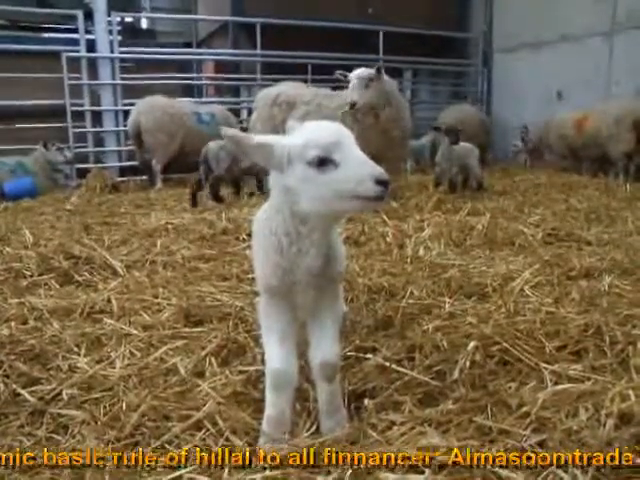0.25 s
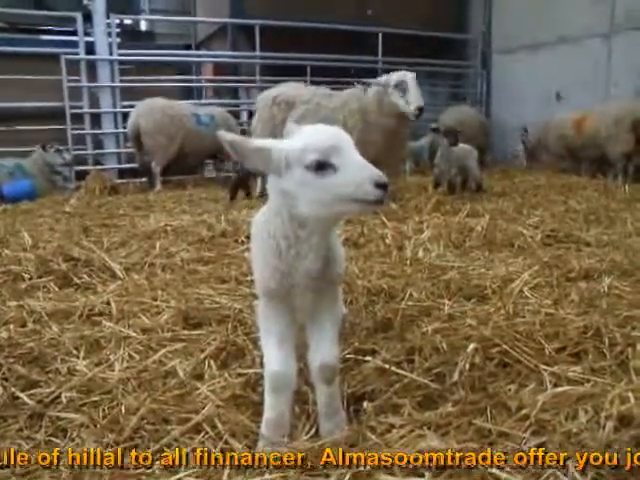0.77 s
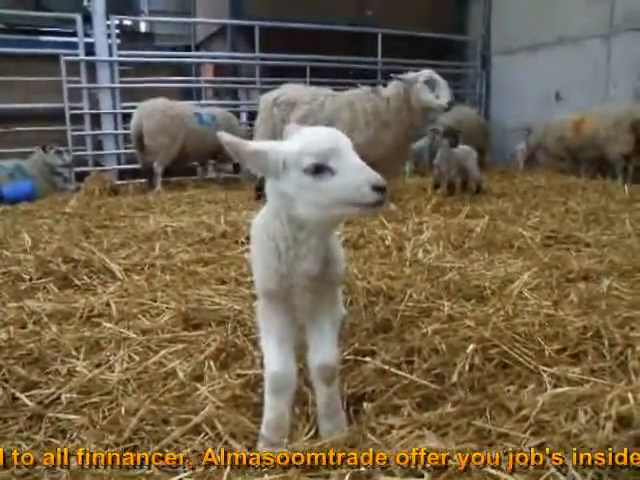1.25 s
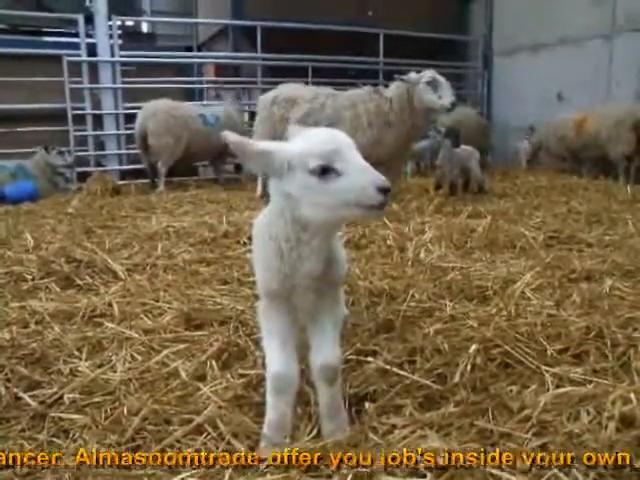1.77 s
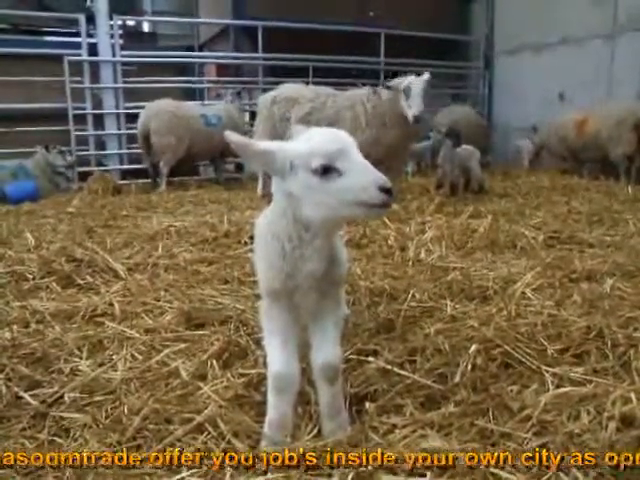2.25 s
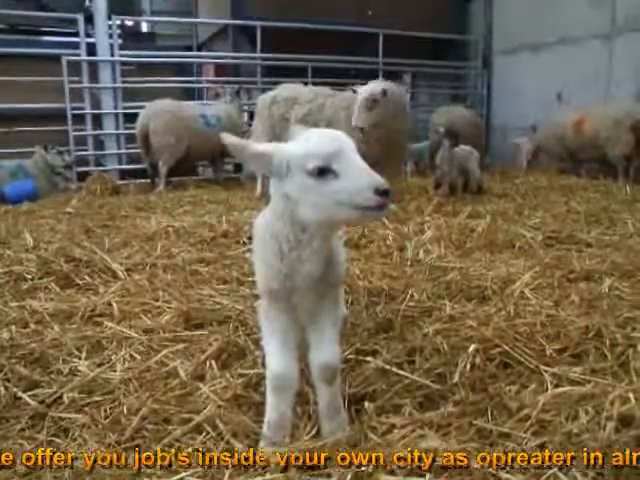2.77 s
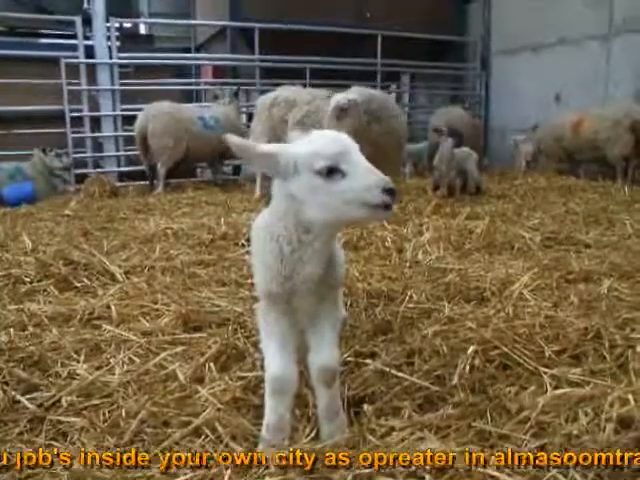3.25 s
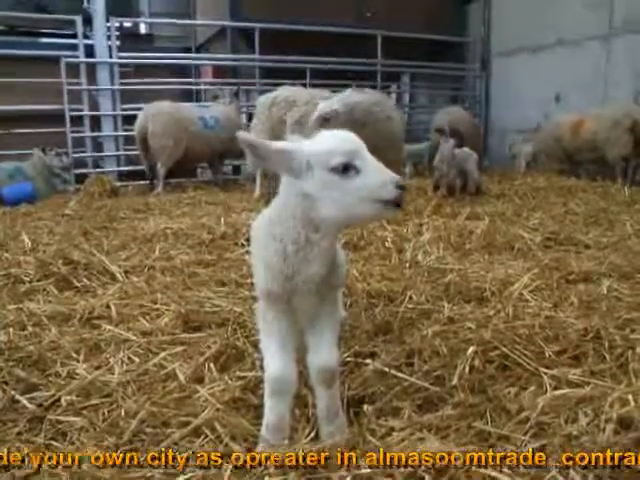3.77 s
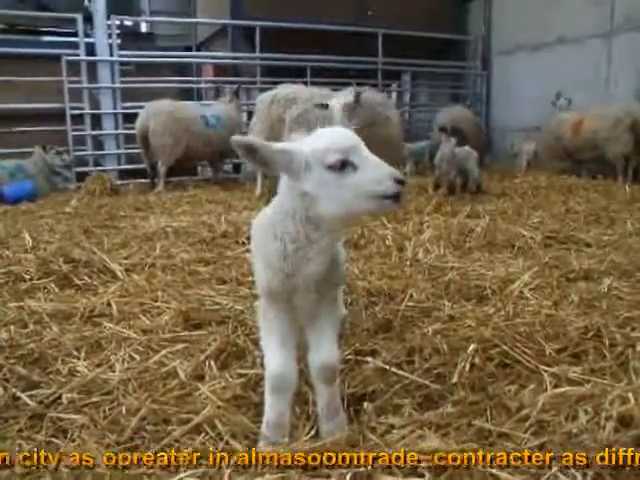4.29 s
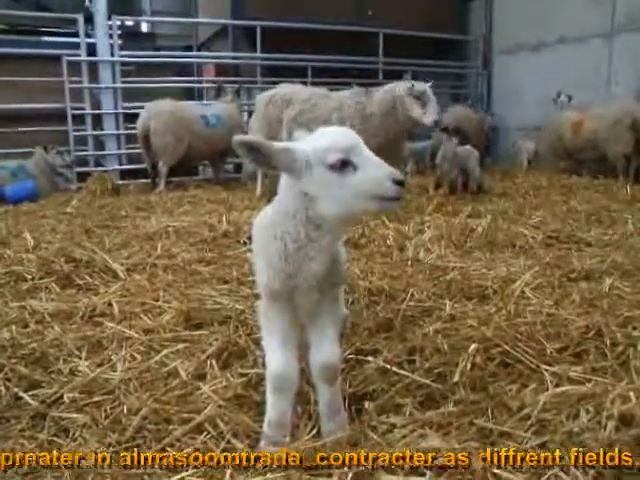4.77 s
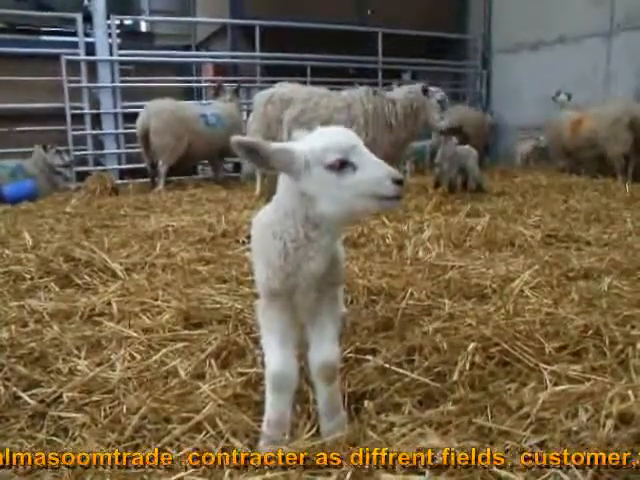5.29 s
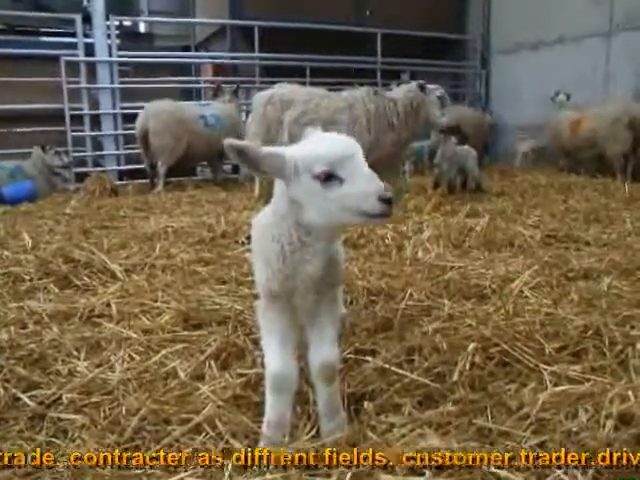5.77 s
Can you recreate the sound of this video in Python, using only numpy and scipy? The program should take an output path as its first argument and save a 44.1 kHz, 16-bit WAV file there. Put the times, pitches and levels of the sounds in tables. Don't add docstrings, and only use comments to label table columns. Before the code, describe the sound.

A trembling young bleat fades over a hoarse ewe, then a bright lamb, distant ewes and a loud raspy near ewe call in a barn.

```python
import sys
import numpy as np
from scipy import signal
from scipy.io import wavfile
from scipy.ndimage import uniform_filter1d

SR = 44100
rng = np.random.default_rng(int(sys.argv[2]) if len(sys.argv) > 2 else 0)


def ratio_of_db(decibels):
    return 10 ** (np.asarray(decibels, float) / 20)


def put_to_file(sound):
    columns = np.atleast_2d(sound).T
    safe = np.clip(columns, -1, 1)
    whole_steps = np.round(safe * 32767)
    wavfile.write(sys.argv[1], SR, whole_steps.astype(np.int16))


N = 265923

# time_s, pitch_hz, effort_db
CALL_YEARLING = [
    (0.0, 189.3, -12),
    (0.1, 185, -16.5),
    (0.244, 175.4, -16),
    (0.332, 168.4, -22),
    (0.378, 158.6, -25.5),
    (0.43, 165, -30.5),
    (0.5, 182.6, -37),
    (0.66, 181, -44),
]
CALL_FIRST = [
    (0.0, 129.1, -19.5),
    (0.142, 129.9, -20),
    (0.496, 130.4, -28),
    (0.594, 124, -29.5),
    (0.708, 125.7, -38.5),
    (0.9, 106.4, -56),
]
CALL_OUTSIDE = [
    (1.15, 163.7, -64),
    (1.272, 164, -44.5),
    (1.5, 160.3, -46),
]
CALL_LAMB = [
    (1.5, 156.6, -54),
    (1.544, 157.3, -41),
    (1.64, 180.6, -18.5),
    (1.734, 211.5, -13),
    (1.862, 228.3, -16),
    (2.284, 225.8, -20),
    (2.414, 227.5, -23.5),
    (2.566, 219.9, -24.5),
    (2.74, 224.9, -47),
]
CALL_UNDER = [
    (1.7, 110.1, -48),
    (1.8, 116.9, -28.5),
    (1.952, 134.5, -24),
    (2.098, 131.5, -25.5),
    (2.31, 116.7, -28),
    (2.452, 114, -28),
    (2.562, 116.6, -30),
    (2.7, 114, -52),
]
CALL_FAR = [
    (2.56, 121.5, -39),
    (2.694, 120.6, -39.5),
    (2.972, 121.6, -30.5),
    (3.278, 121, -31.5),
    (3.57, 121.5, -35),
    (3.738, 120.3, -42.5),
    (3.9, 121.6, -52),
]
CALL_NEAR = [
    (4.05, 90.05, -53.5),
    (4.196, 104.8, -44),
    (4.25, 113.7, -33.5),
    (4.364, 124.6, -21.5),
    (4.54, 131, -16.5),
    (4.654, 130, -18),
    (4.768, 136, -17),
    (4.968, 134.4, -20.5),
    (5.1, 136.9, -27),
]
CALL_LAST = [
    (4.99, 134.7, -29.5),
    (5.314, 126.4, -31),
    (5.41, 121.6, -30.5),
    (5.6, 118.7, -36),
    (5.8, 116.6, -48),
]
CALL_REPLY = [
    (5.0, 118.4, -32),
    (5.2, 117.8, -39),
    (5.3, 117.8, -30.5),
    (5.622, 118.1, -33),
    (5.816, 117.4, -43),
    (5.908, 117.7, -65),
    (6.0, 118, -60),
]

# chest_full_db, chest_share, throat_full_db, throat_share
BUILD_YEARLING = (-19.5, 0.66, -26.5, 0.38)
BUILD_FIRST = (-35.5, .75, -27.5, 0.5)
BUILD_OUTSIDE = (-55, -1, -51, 1.5)
BUILD_LAMB = (-39.5, .4, -25.5, 0.78)
BUILD_UNDER = (-36, 1.7, -29, 0.2)
BUILD_FAR = (-60, 6, -37.5, 1.4)
BUILD_NEAR = (-32, 0.37, -18, 1.19)
BUILD_LAST = (-33.5, 1.2, -26, 1.14)
BUILD_REPLY = (-60.5, 0.3, -36, 0.8)

# peak_s, height_db, length_s
QUAVER_YEARLING = [
    (0.0, 14.5, 0.036),
    (0.061, 13, 0.12),
    (0.223, 11, .09),
    (0.292, 16, 0.1),
    (0.442, 12, 0.057),
]
QUAVER_FIRST = [
    (0.366, 14.5, 0.045),
    (0.435, 12, 0.086),
    (0.509, 12.6, 0.095),
    (0.64, 9.4, 0.11),
]
QUAVER_OUTSIDE = [
    (1.392, 7.8, .17),
]
QUAVER_LAMB = [
    (1.56, 10.5, 0.076),
    (1.742, 10.7, 0.12),
    (1.872, 13.6, 0.074),
    (2.008, 16, 0.083),
    (2.144, 12.1, 0.21),
    (2.3, 12.2, 0.29),
    (2.394, 14, 0.11),
    (2.5, 11.7, 0.12),
]
QUAVER_UNDER = [
    (1.945, 6, 0.11),
]
QUAVER_FAR = [
    (2.7, 11.4, 0.49),
]
QUAVER_NEAR = [
    (4.28, 12.6, 0.19),
    (4.44, 5.7, 0.16),
    (4.502, 11, 0.059),
    (4.58, 10, 0.097),
    (4.751, 12.5, .09),
    (4.82, 7.3, 0.059),
    (4.915, 14.3, .13),
    (5.02, 11.7, 0.076),
]
QUAVER_LAST = [
    (5.147, 6, 0.074),
]
QUAVER_REPLY = [
    (5.2, 11.4, 0.23),
]

# pitch_multiple, level_db; halves come from strong-weak pulse pairs
CHEST_YEARLING = [(1, -19), (2, 0)]
CHEST_LAMB = [(1, 0.5), (2, -11)]
CHEST_EWE = [(1, -1), (2, -3.5), (3, -6)]
CHEST_LAST = [(1, -0.5), (1.5, -8.5), (2, -7), (2.5, -6.5), (3, -5)]

# centre_hz, width_hz, level_db
THROAT_YEARLING = [(565.5, 69, 1.5), (724, 140, -13), (930, 360, -12.5)]
THROAT_EWE = [(605, 40, -14), (662, 22, 0)]
THROAT_LAMB = [(450, 100, -15), (672, 80, 0)]
THROAT_UNDER = [(409, 21, -5.5), (566, 108, 6), (800, 190, -13)]
THROAT_FAR = [(462, 40, -6), (560, 80, -11), (657, 28, 0), (800, 150, -9)]
THROAT_LAST = [(464, 80, -5.5), (607, 30, -6.5), (659, 30, -1.5)]
THROAT_REPLY = [(723, 93, -1.4), (764, 60, -1.1)]

# centre_hz, width_hz, level_db
MOUTH_YEARLING = [(1200, 130, -12), (1286, 64, -13), (1485, 106, 2), (1774, 57, 0), (2130, 110, -8),
                  (2620, 240, -15), (3180, 160, -20)]
MOUTH_EWE = [(360, 224, -4), (537, 31, -2.5), (724, 190, 2), (1050, 230, -13.5), (1372, 254, 4),
             (2034, 430, 4.5), (2370, 1200, -23), (3270, 230, -13.5)]
MOUTH_LAMB = [(886, 120, -20), (1140, 110, -10), (1600, 143, 4.5), (2116, 150, 1.5), (2550, 610, -0.5),
              (2907, 150, -7.5), (3210, 420, -13)]
MOUTH_FAR = [(1190, 490, -1), (1526, 370, 5.5), (1940, 430, 2.5), (2517, 1300, -5.5)]
MOUTH_LAST = [(820, 450, -4), (1045, 220, -7), (1280, 230, -4), (1430, 190, -3), (2190, 700, -7.5)]
MOUTH_REPLY = [(1555, 180, 0.5), (1980, 190, -0.5), (2260, 500, -12.5)]

# time_s, breath_share (0-1)
LAMB_ROUGH = [
    (1.5, .45),
    (1.78, .3),
    (1.92, .1),
    (2.35, .12),
    (2.5, .33),
    (2.74, .5),
]

# freq_hz, density_db (per Hz)
SHED_SPECTRUM = [(15, -34), (25, 7), (97, 4), (156, 9), (195, 5), (227, 8), (375, 5.5), (684, 2.5),
                 (1070, 2.5), (1560, 3.5), (6530, -23.5), (10000, 3), (13000, -39), (22000, -120)]

# time_s, level_db
STRAW_STIR = [(0, -38.5), (1.5, -36.5), (2.7, -39.5), (3.0, -39.5), (3.61, -45.5), (3.83, -41), (4.2, -40),
              (5.24, -44), (5.44, -37), (5.86, -41.5), (6.03, -37)]

ONSET_S, RELEASE_S = 0.08, 0.05
SWELL_RISE_SHARE = 0.4
SHED_T60_S, EARLY_T60_S, TAIL_DB = 0.7, 0.09, -11
SHED_DB, SHED_FOLLOWS = -39.5, 0.33
HISS_UNDER_DB, HISS_FOLLOWS, HISS_SMOOTH_S = -25, 0.67, 0.14
HOLD_HZ, CUTOFF_HZ, OFFSET = 16001.5, 15560, -0.0069


def rms_one(x):
    return x / np.sqrt(np.mean(x ** 2) + 1e-20)


def drift(rate_hz, size):
    r = np.exp(-2 * np.pi * rate_hz / SR)
    noise = rng.standard_normal(size + SR)
    return rms_one(signal.lfilter([1], [1, -2 * r, r * r], noise)[SR:])


def echoes(x, t60_s, level_db):
    t = np.arange(int(t60_s * SR)) / SR
    tail = rng.standard_normal(len(t)) * ratio_of_db(-60 * t / t60_s) * np.clip(t / 0.011, 0, 1)
    tail = tail / np.sqrt(np.sum(tail ** 2))
    return ratio_of_db(level_db) * signal.fftconvolve(x, tail)[:len(x)]


def folds(steady, wander, rough, early_db):
    phase = steady + wander
    size = len(phase)
    pulses = rms_one(sum(np.cos(k * phase) for k in range(1, 32)))
    pulses = pulses * ratio_of_db(2.0 * drift(30.0, size))
    breath = 2.0 * rng.standard_normal(size) * (1 + 0.4 * np.cos(phase))
    source = np.sqrt(1 - rough) * pulses + np.sqrt(rough) * breath
    return source + echoes(source, EARLY_T60_S, early_db)


def evened(x, window_s):
    power = uniform_filter1d(x ** 2, max(int(window_s * SR), 9))
    return x / np.sqrt(power + 0.0099 * np.mean(x ** 2))


def resonate(x, modes, window_s):
    out = 0
    for k, (hz, width_hz, level_db) in enumerate(modes):
        r = np.exp(-np.pi * 1.55 * width_hz / SR)
        flutter_db = 1.6 * drift(14.0, len(x))
        pole = [(1 - r * r) / 2, 0, (r * r - 1) / 2, 1, -2 * r * np.cos(2 * np.pi * hz / SR), r * r]
        ring = evened(signal.sosfilt([pole, pole], x), window_s)
        out = out + (-1) ** k * ratio_of_db(level_db + flutter_db) * ring
    return rms_one(out)


def swells(t, quaver):
    curves = []
    for peak_s, height_db, length_s in quaver:
        corners_s = [-SWELL_RISE_SHARE * length_s, 0, (1 - SWELL_RISE_SHARE) * length_s]
        angle = np.interp(t - peak_s, corners_s, [0, np.pi / 2, 0])
        curves.append(height_db * np.sin(angle))
    return np.max(curves, axis=0)


def bleat(call, build, quaver, chest, throat, mouth, rough, jitter, early_db, throat_share):
    time_s, pitch_hz, effort_db = np.transpose(call)
    lead = SR // 4
    start = max(round(time_s[0] * SR), 0)
    size = round((time_s[-1] - max(time_s[0], 0)) * SR) + lead
    t = (start - lead + np.arange(size)) / SR

    pitch = np.interp(t, time_s, pitch_hz)
    mouth_db = np.interp(t, time_s, effort_db)
    below_db = mouth_db - mouth_db.max()
    chest_full_db, chest_follows, throat_full_db, throat_follows = build
    chest_db = chest_full_db + chest_follows * below_db
    throat_db = throat_full_db + throat_follows * below_db + swells(t, quaver)

    rough = np.interp(t, *np.transpose(rough))
    steady = 2 * np.pi * np.cumsum(pitch * (1 + 0.00554 * drift(12.92, size))) / SR
    wander = 2 * np.pi * np.cumsum(pitch * jitter * drift(69.37, size)) / SR
    throat_source = folds(steady, wander / 2, rough * throat_share, early_db - 5)
    mouth_source = folds(steady, wander, rough, early_db + 2)

    tones = 0
    for multiple, level_db in chest:
        tones = tones + ratio_of_db(level_db + 2.8 * drift(18.0, size)) * np.cos(multiple * steady)
    voice = ratio_of_db(chest_db) * np.sqrt(2) * tones
    voice += ratio_of_db(throat_db) * resonate(throat_source, throat, window_s=0.026)
    voice += ratio_of_db(mouth_db) * resonate(mouth_source, mouth, window_s=0.054)

    edge = np.clip((time_s[-1] - t) / RELEASE_S, 0, 1)
    if start:
        edge = edge * np.clip((t - time_s[0]) / ONSET_S, 0, 1) ** 2
    out = np.zeros(N + size)
    out[start:start + size - lead] = (voice * edge)[lead:]
    return out[:N]


def flock():
    clear = dict(rough=[(0, 0.04)], jitter=0.006, early_db=-8, throat_share=0.5)
    shaky = dict(rough=LAMB_ROUGH, jitter=0.01, early_db=-5, throat_share=0.35)
    hoarse = dict(rough=[(0, 0.7)], jitter=0.045, early_db=1, throat_share=0.3)
    far = dict(rough=[(0, 0.65)], jitter=0.035, early_db=5, throat_share=0.8)
    return (
        bleat(CALL_YEARLING, BUILD_YEARLING, QUAVER_YEARLING,
              CHEST_YEARLING, THROAT_YEARLING, MOUTH_YEARLING, **clear)
        + bleat(CALL_FIRST, BUILD_FIRST, QUAVER_FIRST, CHEST_EWE, THROAT_EWE, MOUTH_EWE, **hoarse)
        + bleat(CALL_OUTSIDE, BUILD_OUTSIDE, QUAVER_OUTSIDE, CHEST_LAMB, THROAT_EWE, MOUTH_FAR, **far)
        + bleat(CALL_LAMB, BUILD_LAMB, QUAVER_LAMB, CHEST_LAMB, THROAT_LAMB, MOUTH_LAMB, **shaky)
        + bleat(CALL_UNDER, BUILD_UNDER, QUAVER_UNDER, CHEST_EWE, THROAT_UNDER, MOUTH_FAR, **hoarse)
        + bleat(CALL_FAR, BUILD_FAR, QUAVER_FAR, CHEST_EWE, THROAT_FAR, MOUTH_FAR, **far)
        + bleat(CALL_NEAR, BUILD_NEAR, QUAVER_NEAR, CHEST_EWE, THROAT_EWE, MOUTH_EWE, **hoarse)
        + bleat(CALL_LAST, BUILD_LAST, QUAVER_LAST, CHEST_LAST, THROAT_LAST, MOUTH_LAST, **far)
        + bleat(CALL_REPLY, BUILD_REPLY, QUAVER_REPLY, CHEST_LAMB, THROAT_REPLY, MOUTH_REPLY, **far)
    )


def straw_db():
    return np.interp(np.arange(N) / SR, *np.transpose(STRAW_STIR))


def shed_noise():
    edges_hz = 22 * 2 ** np.arange(0, 9.1, 0.5)
    freq_hz, density_db = np.transpose(SHED_SPECTRUM)
    white = rng.standard_normal((2, N))
    flicker_db = 1.1 * drift(1.0, N)
    out = 0
    for k, (low_hz, high_hz) in enumerate(zip(edges_hz, edges_hz[1:])):
        sos = signal.butter(2, [low_hz, high_hz], "band", fs=SR, output="sos")
        band_db = np.interp(np.log(low_hz * high_hz) / 2, np.log(freq_hz), density_db)
        out = out + signal.sosfilt(sos, white[k % 2]) * ratio_of_db(band_db + flicker_db)
    stir_db = straw_db()
    return ratio_of_db(SHED_DB + SHED_FOLLOWS * (stir_db - stir_db.mean())) * rms_one(out)


def fine_hiss(dry):
    power = uniform_filter1d(dry[0] ** 2, int(HISS_SMOOTH_S * SR)) + 1e-12
    level = np.sqrt(ratio_of_db(straw_db()) ** 2 + ratio_of_db(HISS_UNDER_DB) ** 2 * power ** HISS_FOLLOWS)
    sos = signal.butter(1, [3000, 12000], "band", fs=SR, output="sos")
    hiss = signal.sosfilt(sos, rng.standard_normal(N))
    return hiss * level * ratio_of_db(3 + 1.07 * drift(12.0, N))


def sample_and_hold(x):
    taken = np.floor(np.arange(N) * HOLD_HZ / SR) * SR / HOLD_HZ
    return np.interp(taken, np.arange(N), x[0])[None]


def scene():
    voices = flock()
    tail = echoes(voices, SHED_T60_S, TAIL_DB)
    return (voices + tail + shed_noise())[None]


def low_pass(x):
    return signal.sosfilt(signal.butter(12, 16050, fs=SR, output="sos"), x)


def record(dry):
    rounded = 1.12 * np.tanh(dry / 1.12)
    held = sample_and_hold(rounded + fine_hiss(dry)) + OFFSET
    sos = signal.ellip(12, 0.3, 70, CUTOFF_HZ - 100, fs=SR, output="sos")
    mix = signal.sosfilt(sos, held)
    return low_pass(mix)


dry = scene()
out = record(dry)
put_to_file(out)
```